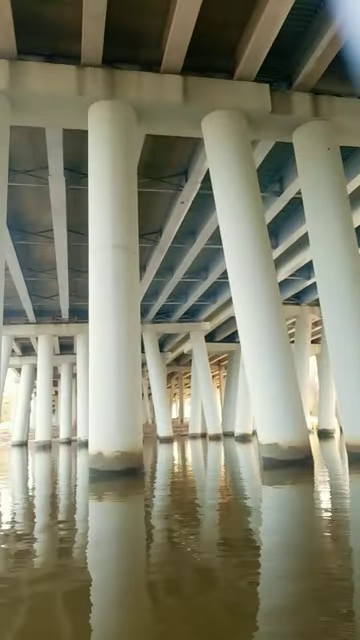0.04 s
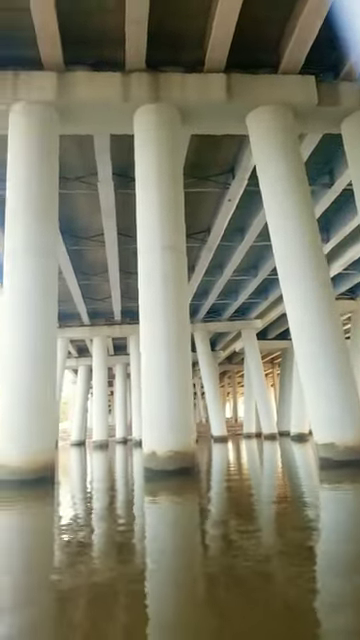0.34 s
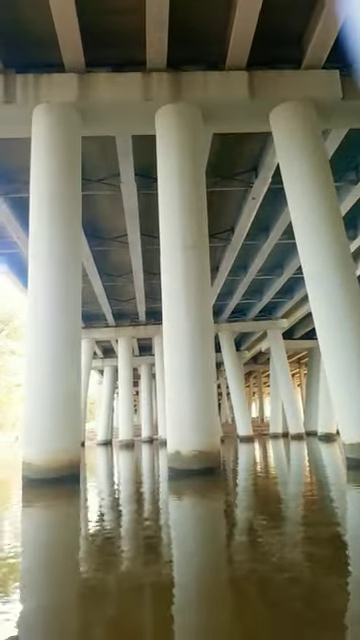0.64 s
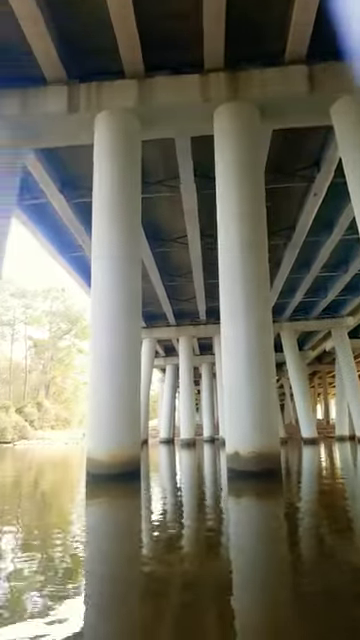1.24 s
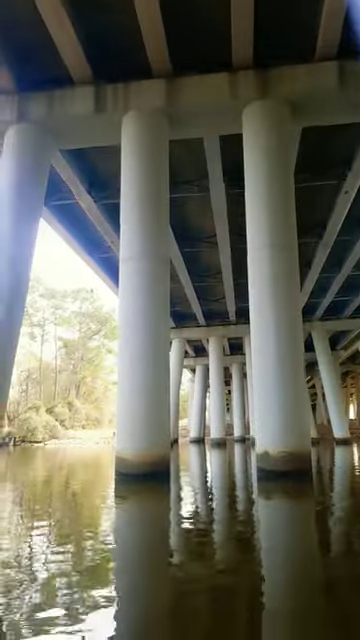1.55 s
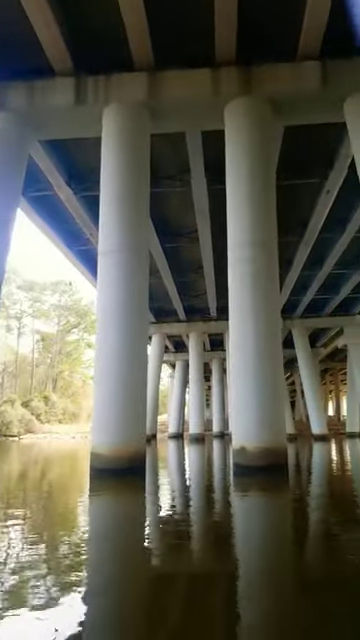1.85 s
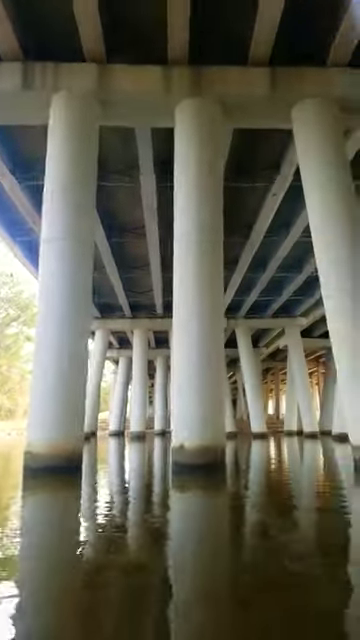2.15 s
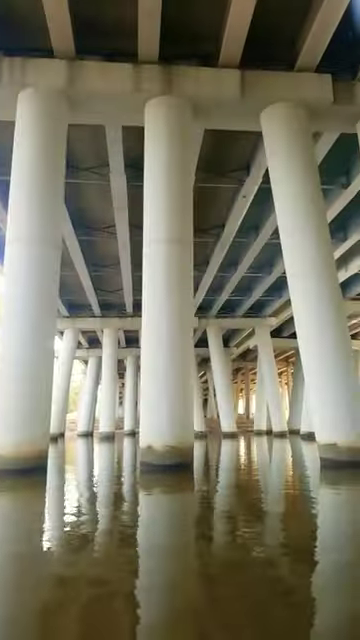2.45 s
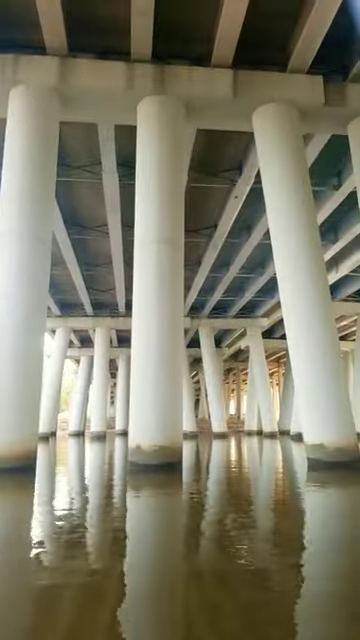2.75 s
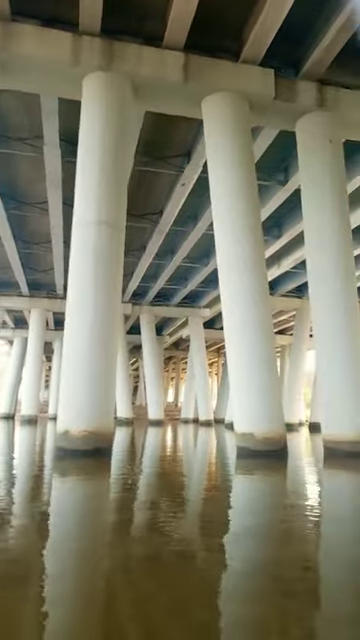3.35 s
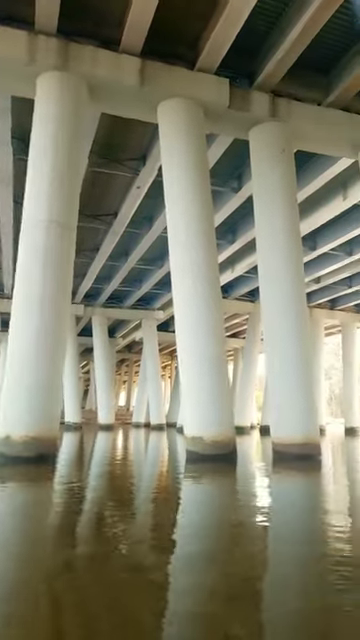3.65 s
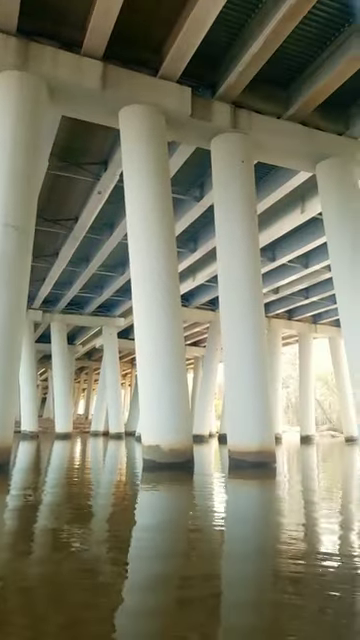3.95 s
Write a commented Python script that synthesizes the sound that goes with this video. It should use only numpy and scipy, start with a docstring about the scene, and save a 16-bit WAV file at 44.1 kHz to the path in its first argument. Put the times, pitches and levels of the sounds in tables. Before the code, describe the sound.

Road traffic rumbles and tyres roar throughout on a concrete bridge overhead, louder on the left. Wheels clack hollowly over joints around 0.2, 2 and 2.9 seconds, echoing among the piers; the first two clusters bring booms and faint metal clinks. Very faint water lapping, tiny close ticks and a thin hiss come and go. At about 3.2 seconds a heavy vehicle adds a deep rumble until the end.

```python
"""Road traffic on a long concrete bridge, heard from the river below on a two-port microphone.
Overhead the deck rumbles and booms, tyres roar, and wheels clack over the expansion joints,
clinking the steel plates and echoing among the piers. Water laps faintly, with a few small ticks
close by and a thin hiss on the left. Near the end a heavy vehicle rolls onto the span."""
import sys
import numpy as np
from scipy import signal
from scipy.fft import irfft
from scipy.io import wavfile
from scipy.ndimage import uniform_filter1d

SR = 44100
rng = np.random.default_rng(int(sys.argv[2]) if len(sys.argv) > 2 else 0)


def to_wav(s):
    """Save 16-bit WAV."""
    ch = np.atleast_2d(s).T  # columns
    pcm = np.round(np.clip(ch, -1, 1) * 32767)  # PCM
    wavfile.write(sys.argv[1], SR, pcm.astype(np.int16))


N = 176400

# how the two microphone ports differ: freq_hz, coherence (0-1), left_lead_rad, left_minus_right_db
PORTS = [(40.2, 0.93, 0.27, 6.5), (172, 0.99, 0.18, 8.5), (320, 0.7, 0.46, 8), (420, 0.9, 0.19, 8.5),
         (510, 0.6, 1.8, 11), (810, 0.6, 1.17, 10.5), (1000, 0, 2.96, 10), (1450, 0.5, 3.4, 10.5),
         (1770, 0, 6.2, 10.5), (2680, 0, 8.2, 14.5), (5070, 0, 13, 13), (7500, 0.4, 25, 19),
         (9400, .05, 22, 4)]


def amp(db):
    """Decibels to gain."""
    return 10 ** (np.asarray(db) / 20)


def at_hz(table, hz, column=1):
    """A column of a spectrum table, interpolated on a log-frequency axis."""
    columns = np.transpose(table)
    return np.interp(np.log(hz + 1e-6), np.log(columns[0]), columns[column])


def curve(table, column=1):
    """A column of a time table at every sample."""
    columns = np.transpose(table)
    return np.interp(np.arange(N) / SR, columns[0], columns[column])


def add(mix, start_s, sound):
    """Mixes a sound in from start_s."""
    part = mix[:, max(round(start_s * SR), 0):][:, :sound.shape[1]]
    part += sound[:, :part.shape[1]]


def noise(colour, size=N):
    """Diffuse noise as both ports hear it, left at rms 1; colour maps Hz to dB."""
    hz = np.fft.rfftfreq(size, 1 / SR)
    left, unrelated = np.exp(2j * np.pi * rng.random((2, len(hz))))
    coherence = np.clip(at_hz(PORTS, hz), 0, 1)
    right = coherence * left + np.sqrt(1 - coherence ** 2) * unrelated
    right *= np.exp(-1j * at_hz(PORTS, hz, column=2)) * amp(-at_hz(PORTS, hz, column=3))
    pair = irfft(np.array([left, right]) * amp(colour(hz)), size)
    return pair / pair[0].std()


def swell(t, rise_s):
    """Rises to 1 at rise_s and dies away."""
    return t / rise_s * np.exp(1 - t / rise_s)


def echoed(t, rise_s, tail_db, t60_s=.7):
    """Envelope of a burst and its echo among the piers."""
    tail = amp(tail_db - 60 * t / t60_s) * (1 - np.exp(-t / (2 * rise_s)))
    return np.hypot(swell(t, rise_s), tail)


def ring(t, hz, rise_s):
    """A short damped resonance of the structure, at both ports."""
    phase = 2 * np.pi * (hz * t + rng.random())
    right = amp(-at_hz(PORTS, hz, column=3)) * np.sin(phase - at_hz(PORTS, hz, column=2))
    return np.sqrt(2) * swell(t, rise_s) * np.array([np.sin(phase), right])


def flutter(depth_db):
    """A second of quick, uneven flutter in level."""
    grain = uniform_filter1d(rng.standard_normal(SR), size=130)
    return amp(depth_db * grain / grain.std())


def deck():
    """The girders overhead rumble under the traffic and boom now and then under a load."""
    # rumble spectrum: freq_hz, density_db
    spectrum = [(15, -40.5), (30, -24.5), (48, -10.5), (64, -3), (85, -6), (120, -5.5), (150, -1), (180, 2),
                (210, -4.5), (250, -9.5), (400, -12.5), (900, -76.5)]
    # rumble loudness: time_s, level_db
    levels = [(0, -13.5), (.3, -19), (.7, -18), (1.2, -20), (1.65, -20.5), (2.1, -19.5), (2.7, -21.5),
              (3.1, -20), (4, -27.5)]
    # booms of the deck: start_s, level_db, pitch_hz, rise_s
    booms = [(.178, -14.5, 186, 0.0056), (0.225, -8.5, 194, 0.0035), (.274, -15.5, 183, 0.01),
             (.333, -13, 186, 0.0058), (0.645, -13.5, 178.4, .011), (1.491, -22.5, 119, 0.02),
             (1.61, -23, 101.6, 0.023), (2.018, -19.5, 185, 0.015), (2.081, -15.5, 168.6, .011),
             (3.182, -21, 95, 0.019), (3.247, -18, 106, 0.015), (3.65, -17.5, 101, .022),
             (3.716, -19, 86, 0.013), (3.796, -13, 175, 0.013)]
    t = np.arange(SR) / SR
    out = noise(lambda f: at_hz(spectrum, f)) * amp(curve(levels))
    for start_s, db, hz, rise_s in booms:
        add(out, start_s, amp(db) * ring(t, hz, rise_s))
    return out


def tyres(treble_hz=1170):
    """Tyres roar on the road above, drifting in loudness and brightness."""
    # roar spectrum: freq_hz, density_db
    spectrum = [(100, -15.5), (220, 1.5), (310, -5), (430, 1.5), (520, -0.5), (700, 1.5), (850, -5.5),
                (1050, -9.5), (1350, -16), (1800, -21.5), (2600, -29.5), (3800, -40.5), (5000, -45.5),
                (6300, -51), (7400, -51), (8600, -75.5), (15000, -82.5)]
    # roar loudness and brightness: time_s, level_db, extra_treble_db
    levels = [(0, -24, 2.5), (.4, -20, -3.5), (.8, -19.5, -1.5), (1.15, -21.5, 0), (1.4, -23.5, 1),
              (1.83, -22, 2.5), (2.05, -17.5, 1), (2.45, -21.5, 4), (2.8, -18, 1.5), (3.12, -20, 1),
              (3.4, -18, 1.5), (3.7, -19.5, 1.5), (4, -21, 2)]
    roar = noise(lambda f: at_hz(spectrum, f))
    dull = signal.sosfiltfilt(signal.butter(2, treble_hz, fs=SR, output="sos"), roar)
    treble = (roar - dull) * amp(curve(levels, column=2))
    return (dull + treble) * amp(curve(levels))


def hiss(right_cut_db=4):
    """A faint high hiss comes and goes on the left."""
    # hiss spectrum: freq_hz, density_db
    spectrum = [(4000, -14), (7300, 7), (8500, -0.5), (9800, 0), (11500, -6), (12800, 0.5), (14000, -8.5),
                (15500, -6.5)]
    # hiss loudness: time_s, level_db
    levels = [(0, -73), (.15, -67), (.24, -62.5), (.42, -67), (.66, -73), (.74, -62), (.82, -67),
              (.9, -65.5), (1.45, -76), (1.85, -80), (2.05, -63.5), (2.22, -72), (2.54, -62), (2.75, -61),
              (3, -69), (3.23, -72), (3.31, -63), (3.58, -72), (4, -67)]
    return noise(lambda f: at_hz(spectrum, f)) * amp(curve(levels)) * amp([[0], [-right_cut_db]])


def joint_clacks():
    """Each wheel strikes an expansion joint with a hollow clack, scattered by the girders."""
    # wheel strikes: start_s, level_db, pitch_hz, ringing_share (0-1; the rest is clatter)
    strikes = [(.180, -12.5, 626, 0.54), (.190, -9, 450, .85), (.227, -8.5, 543, 0.1),
               (.243, -20, 696, 0.54), (.262, -11, 418, 0.84), (.287, -11.5, 510, 0.3),
               (.332, -12, 492, .2), (.497, -14.5, 773, 0.36), (.533, -15.5, 633, 0.3),
               (.735, -15.5, 714, 0.3), (1.254, -16, 710, 0.72), (1.910, -10.5, 650, 0.67),
               (1.937, -16.5, 600, 0.1), (1.973, -12.5, 670, 0.58), (1.984, -10.5, 600, 0.8),
               (2.032, -13.5, 610, .15), (2.050, -17, 600, 0.6), (2.076, -12.5, 752, 0.4),
               (2.108, -16, 644, .3), (2.687, -12, 700, 0.9), (2.848, -16.5, 876, 0.5),
               (2.870, -5.5, 724, 0.97), (2.970, -11.5, 744, .85), (3.006, -15.5, 747, 0.5),
               (3.48, -17.5, 430, .4)]
    # clatter spectrum about the pitch: pitch_multiple, density_db
    spread = [(.1, -30), (.4, -15), (.72, -1.5), (1, 0), (1.25, -3), (1.55, -17), (2, -24), (4, -35),
              (8, -57.5), (20, -88.5)]
    out, t = np.zeros((2, N)), np.arange(SR) / SR
    for start_s, db, hz, share in strikes:
        clatter = noise(lambda f: at_hz(spread, f / hz), size=SR)
        clatter *= amp(-3) * echoed(t, rise_s=.0081, tail_db=-6)
        tone = ring(t, hz, rise_s=.0033)
        add(out, start_s, amp(db) * (np.sqrt(share) * tone + np.sqrt(1 - share) * clatter))
    return out


def plate_clinks():
    """Some wheels make the steel joint plates ring and rattle."""
    # plate clinks: start_s, level_db, pitch_hz, ringing_share (0-1; the rest is rattle)
    clinks = [(.168, -47, 5160, 0), (0.229, -43.5, 5380, 0.1), (1.902, -44, 5000, .24),
              (1.956, -47.5, 4820, .04), (2.017, -44.5, 4970, .22), (2.031, -50, 5400, .4),
              (2.071, -48.5, 4700, .03), (2.142, -52, 5150, .08)]
    # rattle spectrum: freq_hz, density_db
    spectrum = [(1000, -17), (2300, 0.5), (2900, 11.5), (3500, 0.5), (4700, -2), (5300, 0.5), (6400, -6),
                (7300, -1.5), (8600, -20), (13000, -22), (16000, -27.5)]
    out, t = np.zeros((2, N)), np.arange(SR) / SR
    for start_s, db, hz, share in clinks:
        rattle = noise(lambda f: at_hz(spectrum, f), size=SR) * flutter(depth_db=2.5)
        rattle *= echoed(t, rise_s=.007, tail_db=-8.5)
        tone = ring(t, hz, rise_s=.006)
        add(out, start_s, amp(db) * (np.sqrt(share) * tone + np.sqrt(1 - share) * rattle))
    return out


def water():
    """Small waves under the bridge break into a grainy fizz."""
    # lapping waves: start_s, level_db
    laps = [(.295, -52), (.35, -49), (.485, -52.5), (.53, -47.5), (0.586, -47), (.845, -53), (1.025, -50),
            (1.076, -49), (1.11, -61), (2.679, -50), (2.735, -52.5), (2.78, -60), (2.851, -63),
            (3.295, -51), (3.421, -52)]
    # fizz spectrum: freq_hz, density_db
    spectrum = [(800, -6.5), (2500, 7.5), (5000, 0.5), (6200, -7.5), (7400, -3), (8600, -22.5),
                (15000, -31)]
    out, t = np.zeros((2, N)), np.arange(SR) / SR
    for start_s, db in laps:
        fizz = noise(lambda f: at_hz(spectrum, f), size=SR) * flutter(depth_db=1.2)
        add(out, start_s, amp(db) * fizz * echoed(t, rise_s=.018, tail_db=-4))
    return out


def ticks():
    """Thin, sharp ticks close to the microphone, on one side or the other."""
    # small ticks: start_s, level_db, pitch_hz, left_minus_right_db, width_octaves
    events = [(.722, -65, 11000, 10, .5), (.733, -64, 14000, 7, .4), (.859, -63, 10500, 12, .3),
              (.8715, -55, 13300, 21.5, 0.31), (1.259, -60, 6300, -5, .7), (3.655, -63, 8000, -8, .8)]
    out, t = np.zeros((2, N)), np.arange(SR) / SR
    for start_s, db, hz, pan_db, octaves in events:
        band = noise(lambda f: -20 * np.log10(1 + (np.log2((f + 1) / hz) / octaves) ** 2), size=SR)
        band /= band.std(1, keepdims=True)  # both sides equal before panning
        gains = amp([[db + pan_db / 2], [db - pan_db / 2]])
        add(out, start_s, gains * band * echoed(t, rise_s=.0008, tail_db=-24.5))
    return out


def heavy_vehicle(start_s=3.17, rise_s=.02, level_db=-17.5, fade_db_per_s=2):
    """A deep rumble sets in at once as the vehicle rolls onto the span, then slowly fades."""
    # rumble spectrum: freq_hz, density_db
    spectrum = [(25, -40.5), (55, -6), (80, 3), (105, 1.5), (135, -4), (170, 3), (260, -6), (420, -15),
                (900, -73)]
    t = np.maximum(np.arange(N) / SR - start_s, 0)
    envelope = np.minimum(t / rise_s, 1) * amp(level_db - fade_db_per_s * t)
    return noise(lambda f: at_hz(spectrum, f)) * envelope


def scene():
    """Traffic above, river below."""
    traffic = deck() + heavy_vehicle() + tyres() + joint_clacks() + plate_clinks()
    return traffic + water() + ticks() + hiss()


def record(dry):
    """The recorder passes nothing much above 15.4 kHz."""
    lowpass = signal.firwin(511, 15400, window=("kaiser", 9), fs=SR)
    return signal.oaconvolve(dry, lowpass[None], "same")


dry = scene()
out = record(dry)
to_wav(out)
```